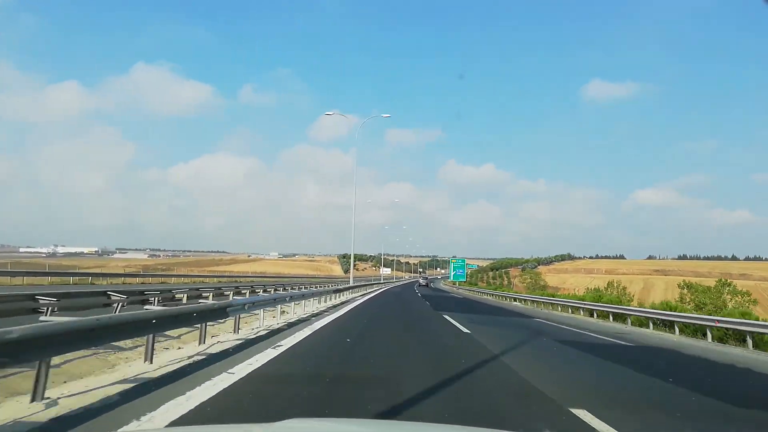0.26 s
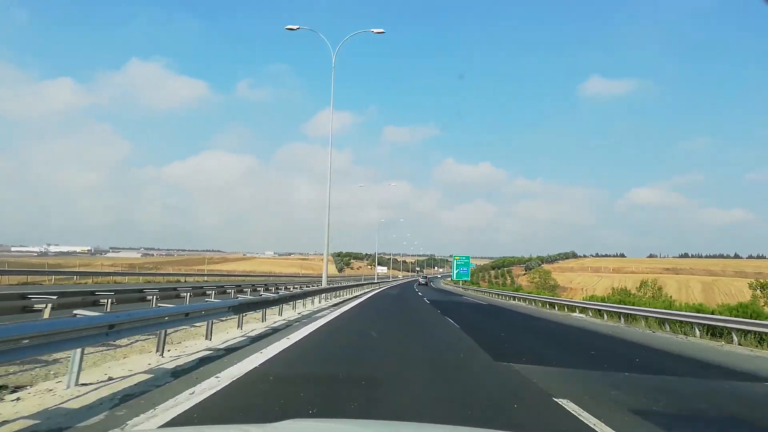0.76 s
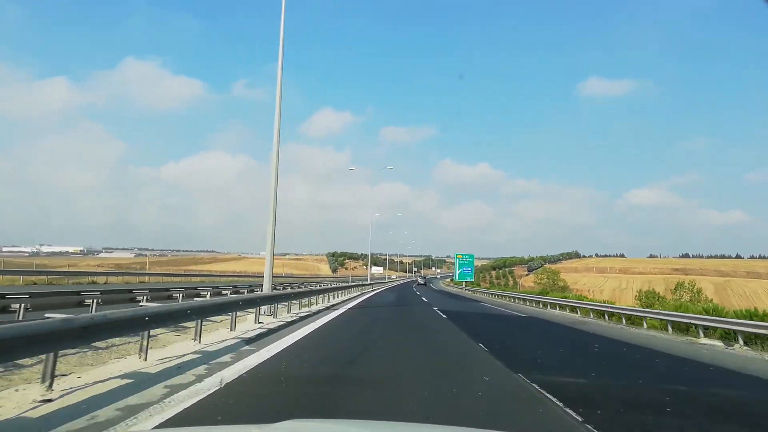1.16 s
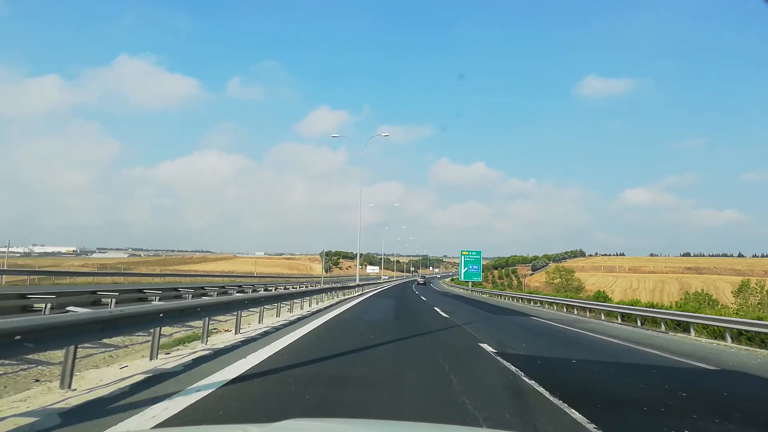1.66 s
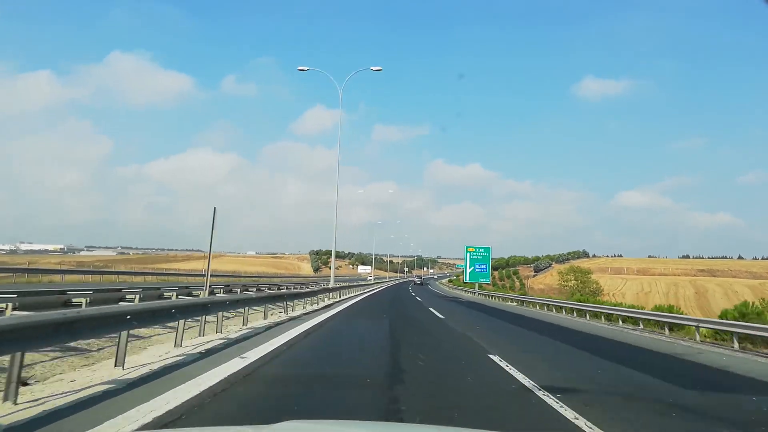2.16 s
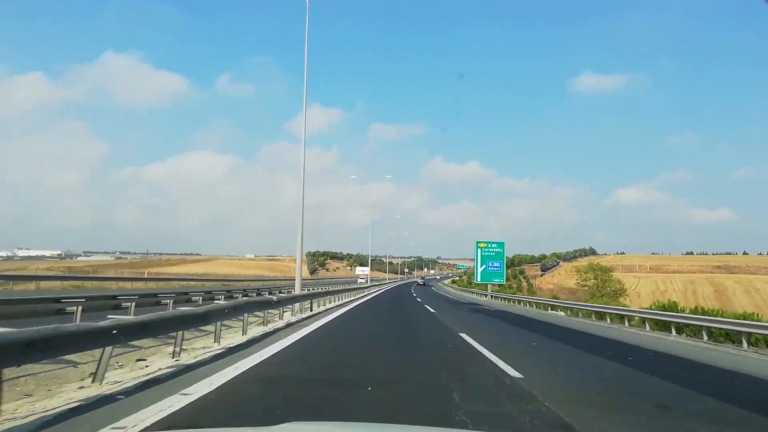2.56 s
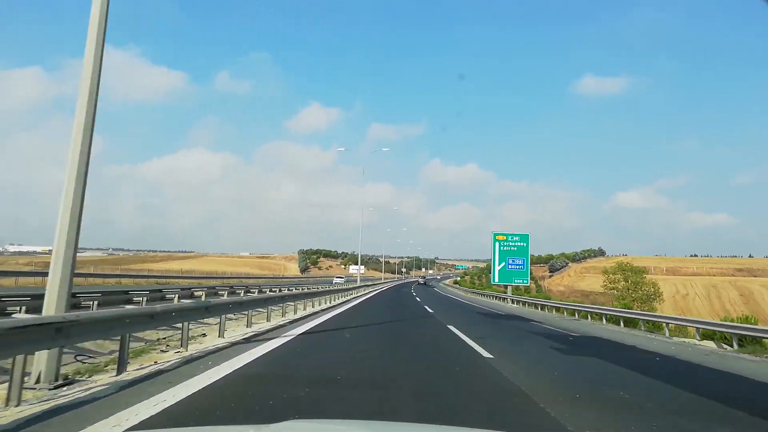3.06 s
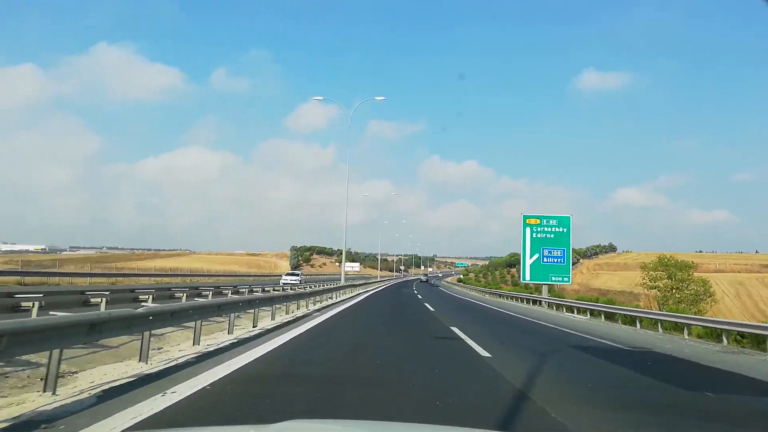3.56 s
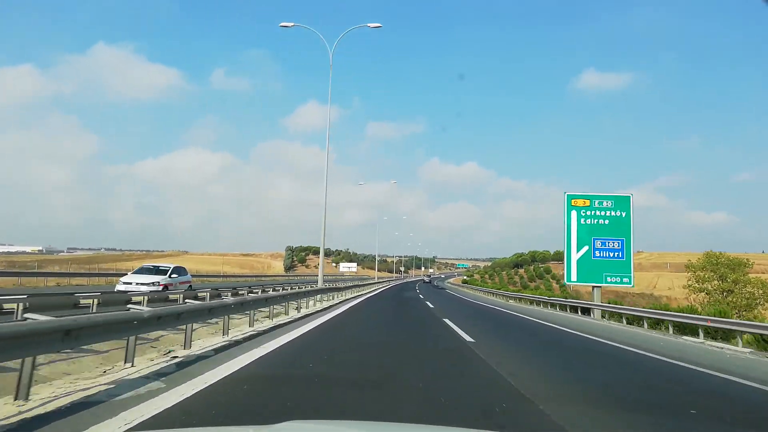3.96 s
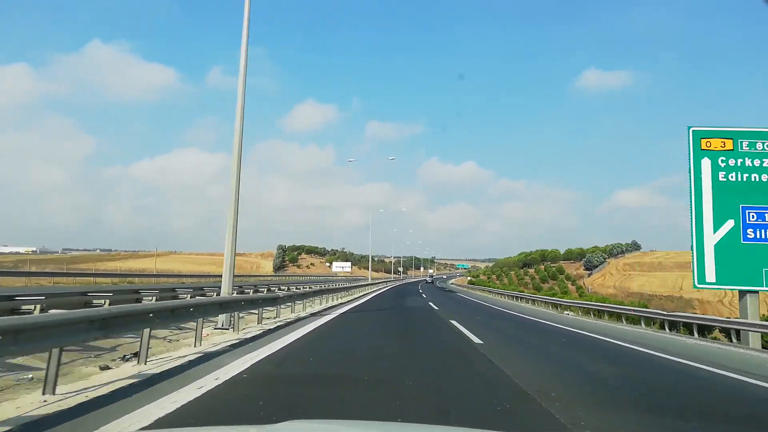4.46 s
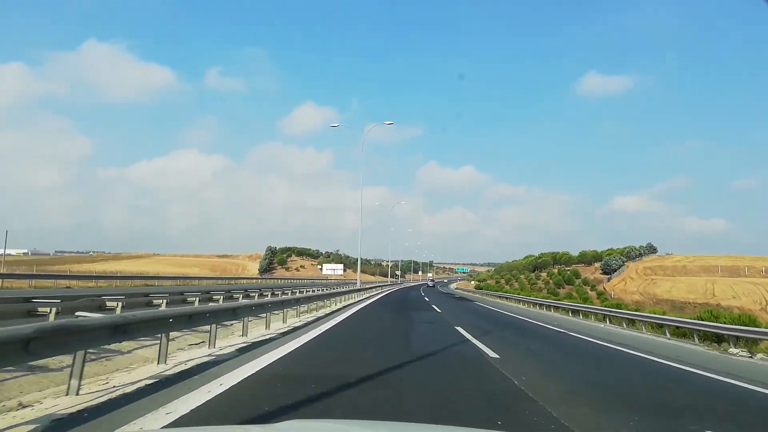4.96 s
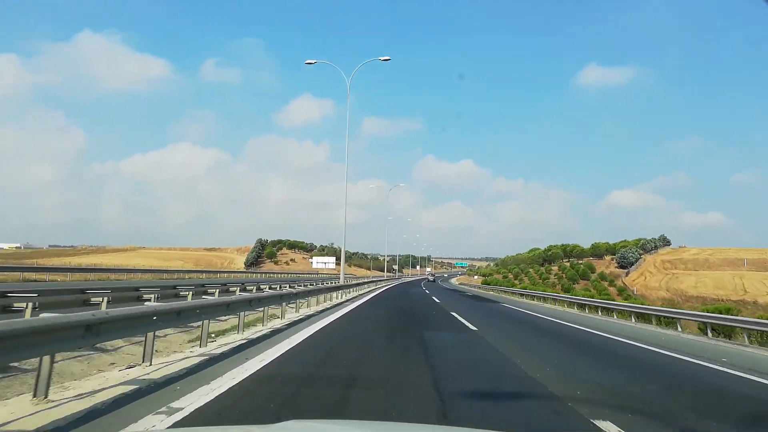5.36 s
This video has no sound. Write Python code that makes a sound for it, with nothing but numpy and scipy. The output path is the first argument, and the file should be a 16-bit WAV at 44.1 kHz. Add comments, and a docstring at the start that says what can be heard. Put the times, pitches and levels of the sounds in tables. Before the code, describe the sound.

Inside a moving car on a motorway, a steady, muffled roar of tyres and wind never stops. Deep booms thud up at about half a second, then a stronger cluster rolls from two to three seconds, with loose trim ticking and rustling. It calms afterwards, with a few weaker bumps near the end. Stereo microphones in the cabin duck slightly under the booms.

```python
"""A steady roar of tyres and wind in a car at motorway speed, then deep booms over rough patches.
Road unevenness shakes noise-driven modes of body, cabin air, suspension and tyre cavity.
Roar is shaped noise coloured by the cabin; something loose rustles (clumped noise) and ticks
(snaps plus ringing trim). A microphone pair hears it; gain control ducks everything under booms."""
import sys
import numpy as np
from scipy import signal
from scipy.fft import rfft, irfft
from scipy.io import wavfile
from scipy.ndimage import uniform_filter1d

SR = 44100
rng = np.random.default_rng(int(sys.argv[2]) if len(sys.argv) > 2 else 0)


def bounce(signal):
    """Save signal as a 16-bit WAV file at the path given by the first command-line argument."""
    frames = np.transpose(np.atleast_2d(signal))
    limited = np.clip(frames, -1, 1)
    pcm = np.round(limited * 32767).astype(np.int16)
    wavfile.write(sys.argv[1], SR, pcm)


N = 246945
FRAME, HOP = 4096, 1024  # samples
HZ = np.fft.rfftfreq(FRAME, 1 / SR)

# Mode tables: level relative within the group, width before the skirt exponent
# body on its mounts: (frequency [Hz], width [Hz], level [dB])
HEAVE_MODES = [(24.8, 8.4, -5), (38.4, 10, -13.5)]
# cabin air and floor pan: (frequency [Hz], width [Hz], level [dB])
BOOM_MODES = [(49.87, 7.7, 1.5), (60, 6.4, -8.5), (69.7, 13.3, -5.5), (87.4, 8.3, -9)]
# suspension: (frequency [Hz], width [Hz], level [dB])
THUD_MODES = [(97.7, 5.9, -5.5), (123.6, 6.3, 4), (131.3, 12.4, -2.5), (145.6, 9, -2.5)]
# air ring in the tyres: (frequency [Hz], width [Hz], level [dB])
CAVITY_MODES = [(172, 16, -2.5), (199.9, 16.3, -2), (221.1, 6.6, -1.5), (244.2, 10.6, -4.5)]
# panels: (frequency [Hz], width [Hz], left level [dB], right level [dB])
DRONE_MODES = [(270.3, 52, -1, -2.5), (297, 11.3, 1, 1), (333.3, 19.5, -7.5, 1.5), (354, 12, -10.5, 1),
               (368, 126, -9.5, -11), (467, 33, -13.5, -19)]

# uneven road: (start [s], length [s], heave [dB], boom [dB], thud [dB], tyre cavity hum [dB])
ROAD_PATCHES = [(0.38, 0.074, -30, -16, -16, -31), (0.473, 0.076, -30, -23, -16.5, -38),
                (0.663, 0.15, -28, -25, -28.5, -34), (0.821, 0.066, -25, -28, -23, -45),
                (1.156, 0.089, -43, -25, -41, -40), (1.332, 0.071, -30, -33, -33, -44),
                (1.799, 0.13, -27, -29, -23.5, -33), (1.901, 0.094, -23, -15.5, -19.5, -29.5),
                (2.014, 0.1, -20, -25, -30, -31.5), (2.115, .1, -17, -15, -23.5, -36),
                (2.229, 0.068, -17, -15.5, -21.5, -46), (2.429, 0.18, -18.5, -25.5, -35, -51),
                (2.605, 0.09, -23.5, -25, -33, -43), (2.738, 0.077, -22, -23, -26.5, -24.5),
                (2.804, 0.12, -17.5, -20.5, -17.5, -27.5), (3.465, .1, -48, -29, -50, -38),
                (4.12, 0.074, -37, -37, -31, -31), (4.392, .07, -36, -36, -37, -32),
                (4.663, 0.12, -25, -28.5, -30, -31.5), (4.824, 0.055, -34, -33, -28, -39),
                (5.2, 0.096, -30, -30, -44, -35.5), (5.414, 0.22, -18.5, -24, -36, -38)]
# Per group, in the order heave, boom, thud, hum, drone
# level on plain asphalt: (level [dB])
ASPHALT_DB = [-32, -29.5, -30, -33, -36]
# shift of the answer from the patch start; hum and drone lead: (lag [s])
GROUP_LAG_S = [0.046, 0.068, 0.011, -0.014, -0.0095]
# decay after the patch: (t60 [s])
SETTLE_T60_S = [0.48, 0.77, .15, 0.35, 0.11]
BUILD_S = 0.035  # time to full swing
DRONE_SHARE_DB = -8.5  # panels' share of the hum's shake

# tread and wind spectrum: (frequency [Hz], relative density [dB per Hz])
ROAR_SPECTRUM = [(260, -46), (450, 0), (522, -3), (596, -3.5), (756, -3.5), (986, -7.5), (1350, -9.5),
                 (1680, -14), (2580, -26.5), (4030, -27), (7070, -41), (9230, -42), (15500, -70)]
# standing waves at the two microphones: (frequency [Hz], width [Hz], left gain [dB], right gain [dB])
CABIN_WAVES = [(578, 32, 3.5, 2), (721, 12, -8.5, -0.5), (757, 25, 4.5, 7), (900, 31, -7.5, 8),
               (909, 31, 11, -7), (1054, 53, -1, 4.5), (1300, 40, -2.5, -11.5), (1332, 34, 3, 8),
               (1435, 58, -9, -0.5), (1667, 28, -11, 6), (1777, 74, 4, -11.5), (1880, 14, 3, 10.5),
               (2068, 80, 1.5, 5.5), (2237, 91, 7, 4), (2460, 60, 4, 4.5)]
# roar of the tread: (time [s], level [dB])
ROAR_LEVEL = [(0, -45.5), (1.5, -45.7), (3.0, -45.5), (4.0, -44.5), (4.8, -45), (5.6, -45)]

# slides of the loose thing:
# (start [s], length [s], level at end [dB], growth over length [dB], added on left [dB])
SLIDE_EVENTS = [(.03, 0.12, -63, 11, 6), (0.408, .065, -66.5, 2.5, 1), (.5, .18, -66, 4, -4),
                (1.93, .23, -64, 7, -1), (2.155, 0.088, -58, 0, -1), (2.257, 0.12, -60.5, -1.5, -1),
                (2.372, 0.11, -56, .3, -.5), (2.53, 0.12, -67.5, 6, -.3), (2.683, .05, -68, -1.5, -.3),
                (2.782, .05, -66.5, 1.5, 0), (2.89, .05, -66, .3, 0), (2.98, .06, -69, -2.5, 0),
                (3.11, 0.14, -73, -11, 4), (3.21, 0.12, -67, -1.5, -3), (3.332, 0.12, -69, -10, .3),
                (3.662, .22, -73, 5, .5), (3.918, 0.096, -67, -4, 3), (4.02, 0.1, -63, 1.5, 2),
                (4.17, 0.36, -80, 3, .5), (5.416, 0.15, -69, 0, .2)]
# scrape spectrum: (frequency [Hz], relative density [dB per Hz])
RUSTLE_SPECTRUM = [(2000, -40), (3500, -4.5), (6000, -9.5), (8000, -3.5), (10000, -4), (11500, -5.5),
                   (13000, -8), (15500, -10)]
# faint rustle's spectrum against the slides': (frequency [Hz], gain [dB])
SHIVER_TILT = [(2000, 1), (10000, 1), (13000, -4), (15500, -9)]
SHIVER_DB = -74  # faint constant rustle
GRIP_S, STOP_T60_S = 0.025, 0.16  # a slide takes hold, then stops

# (time [s], level [dB], left minus right [dB], trim knock re snap [dB], snap t60 [s], snap centre [Hz])
TICK_EVENTS = [(0.1354, -49, -1, -14, .04, 7500), (0.147, -53, 0, -14, .04, 7500),
               (0.158, -52, 0, -14, .04, 8000), (0.4189, -61, -6, -12, .04, 9500),
               (0.44, -56, -3, -18, .15, 4870), (0.4613, -57, -5, 1, .05, 7500),
               (2.1732, -46.5, 0, -6, .04, 8500), (2.2234, -53, -5, -12, .05, 9500),
               (2.2914, -51, -16, -20, .02, 13500), (2.328, -48, 0, -18, 0.044, 4600),
               (2.4016, -48, -15, -18, 0.043, 9100), (2.6367, -44, -13.5, 2.5, 0.019, 8700),
               (2.6908, -58, -3, -12, .06, 8500), (2.7332, -55, -10, -7, .04, 8000),
               (2.799, -61, -1, -12, .03, 9000), (2.819, -53, -7, -5, .04, 8500),
               (2.899, -47, -7, -2.5, 0.037, 9000), (2.9886, -57, -6, -12, .04, 8500),
               (3.9474, -61, -3, -16, .05, 10000), (4.0294, -61, -4, -16, .04, 9000),
               (4.5094, -61, -3, -12, .04, 9500), (5.0325, -61, -5, -12, .06, 9000),
               (5.473, -50, -7, -7, 0.036, 8500), (5.4984, -51, -9, -6, 0.029, 9500)]
# ringing plastic trim: (frequency [Hz], relative level [dB], t60 [s])
TRIM_MODES = [(1630, 4.5, .03), (1760, -1.5, 0.036), (2250, 0, 0.011), (2940, 1, 0.023), (3628, -5, .012),
              (4240, -5, 0.012), (4700, -9, 0.011), (5600, -12, .008)]

# treble colour of the two microphone ports: (frequency [Hz], left gain [dB], right gain [dB])
PORT_GAINS = [(1500, 0, 4), (5000, -2.5, 0.5), (7000, 1.5, 0), (9500, -1.5, 1.5), (10900, -5.5, 2),
              (13000, -3, -4), (15500, -10, -3)]
# microphone pair: (frequency [Hz], likeness [0-1], right leads by [rad], left minus right [dB])
MIC_PAIR = [(20, 1, 0, 0), (50, 1, .06, 0), (75, .993, .1, 0), (100, .95, .2, 0), (200, .94, .3, 0),
            (240, .8, .3, -.5), (310, .2, .3, -1), (430, .3, 1.6, -1), (520, .78, 3.1, -1),
            (900, .65, 3.5, -2), (1500, .5, 6.2, -5), (2100, .35, 9.4, -4.5), (3300, .2, 12.6, -4.5),
            (5700, .1, 21, -4), (7300, .1, 27, -4), (10000, .1, 37, -11), (12000, .1, 44, -10),
            (15500, .1, 57, -3)]
HISS_DB, EDGE_HZ = -75.5, 15740  # microphone noise; upper band limit
DUCK_ABOVE_DB, DUCK_DB_PER_DB = -21.5, 0.21
RECOVERY_DB_PER_S = 11.0  # fall of the held level, not of the gain


def body():
    """Four groups of low modes, each driven by noise and shaken by the road's unevenness."""
    out = np.zeros((2, N))
    for group, modes in enumerate((HEAVE_MODES, BOOM_MODES, THUD_MODES, CAVITY_MODES)):
        db = modes_db(modes, skirt=1.46)
        ringing = pair_noise(db, db, patchy_db=1.6)
        # the road, more than chance, sets the level: even out part of the noise's own swell
        swell = smooth(ringing.mean(0) ** 2, 3000, 2000)
        steadied = evened(ringing / (abs(swell) + 0.089) ** 0.28)
        out += shake(group, group + 2) * steadied
    return out


def tyres():
    """Panel modes drone with the tyre hum; wide tread and wind noise takes the cabin's colour."""
    drone_left_db = modes_db(DRONE_MODES, skirt=1.44)
    drone_right_db = modes_db(DRONE_MODES, skirt=1.263, axis=3)
    drone = pair_noise(drone_left_db, drone_right_db, patchy_db=0.72)
    left_db, right_db = (
        read(ROAR_SPECTRUM, HZ) + sum(wave[k] * peak(wave[0], wave[1]) for wave in CABIN_WAVES)
        for k in (2, 3))
    roar = pair_noise(left_db, right_db, patchy_db=0.8)
    return shake(4, 5, DRONE_SHARE_DB) * drone + curve(ROAR_LEVEL, axis=1) * roar


def rustle():
    """Dense tiny scrapes as noise in clumps a few ms long: slides over a constant faint shiver."""
    clumps = evened(smooth(rng.standard_normal(N), 220, 120))
    grain = evened(gain_of(0.9 * clumps))
    left_db, right_db = (read(RUSTLE_SPECTRUM, HZ) + read(PORT_GAINS, HZ, axis=k) for k in (1, 2))
    slide_power = np.zeros((2, N))
    for start, length, db, grow_db, left_add_db in SLIDE_EVENTS:
        power = gain_of([[db + left_add_db], [db]]) ** 2
        slide_power += power * gesture(start, length, GRIP_S, STOP_T60_S, grow_db)
    slides = np.sqrt(slide_power) * pair_noise(left_db, right_db, patchy_db=1.3)
    tilt_db = read(SHIVER_TILT, HZ)
    shiver = gain_of(SHIVER_DB) * pair_noise(left_db + tilt_db, right_db + tilt_db, patchy_db=1.5)
    return (slides + shiver) * grain


def ticks():
    """Each tick is a bright snap of noise plus a ragged knock that rings the plastic trim."""
    out = np.zeros((2, N + FRAME))
    t = np.arange(FRAME) / SR
    trim = sum(gain_of(db - 60 * t / t60) * np.sin(2 * np.pi * hz * t) for hz, db, t60 in TRIM_MODES)
    ports = gain_of([read(PORT_GAINS, HZ, axis=1), read(PORT_GAINS, HZ, axis=2)])
    for start, db, pan_db, knock_db, t60, hz in TICK_EVENTS:
        burst, chatter = rng.standard_normal((2, 2, FRAME))
        # low snaps are narrow and ping, high ones spread wide
        log_width = (hz / 25000) ** 1.12
        band = ports * np.exp(-(np.log(HZ / hz + 1e-9) / log_width) ** 2 / 2)
        snap = irfft(rfft(burst) * band) / np.sqrt(np.mean(band ** 2))
        snap *= gain_of(-60 * t / t60) * np.minimum(t / 0.00071, 1)
        # one blow, then the contact chatters briefly
        blows = (t == 0) + 0.071 * chatter * np.exp(-t / 0.00037)
        blows /= np.linalg.norm(blows[1])
        knock = signal.fftconvolve(blows, trim[None], axes=1)[:, :FRAME]
        sides = gain_of(db + np.array([[pan_db / 2], [-pan_db / 2]]))
        at = round(start * SR)
        out[:, at:at + FRAME] += sides * (snap + gain_of(knock_db) * knock)
    return out[:, :N]


def shake(group, column, share_db=0):
    """Amplitude of a mode group: plain asphalt plus its time-shifted answer to every patch."""
    power = gain_of(ASPHALT_DB[group]) ** 2
    for patch in ROAD_PATCHES:
        start = patch[0] + GROUP_LAG_S[group]
        answer = gesture(start, patch[1], BUILD_S, SETTLE_T60_S[group])
        power = power + gain_of(patch[column] + share_db) ** 2 * answer
    return np.sqrt(power)


def gesture(start, length, rise, t60, grow_db=0):
    """Power that rises smoothly, changes by grow_db over its length, and dies away."""
    t = np.arange(N) / SR - start
    up = np.sin(np.pi / 2 * np.clip(t / rise, 0, 1)) ** 2
    growth_db = grow_db * (np.clip(t / length, 0, 1) - 1)
    decay_db = -60 * np.clip(t - length, 0, 2 * t60) / t60
    return (up * gain_of(growth_db + decay_db)) ** 2


def pair_noise(left_db, right_db, patchy_db):
    """Noise at two microphones, partly alike, patchy in time and frequency; mid signal rms 1."""
    frames = N // HOP + 5
    a, b, c, d, patches = rng.standard_normal((frames, len(HZ), 5)).T
    patches = uniform_filter1d(patches, size=40, axis=0)
    patches = evened(uniform_filter1d(patches, size=4, axis=1))
    shared, own = a + 1j * b, c + 1j * d
    same = np.clip(read(MIC_PAIR, HZ), 0, 1)[:, None]
    lead_rad = np.interp(HZ, *np.transpose(MIC_PAIR)[[0, 2]])
    right = np.exp(1j * lead_rad)[:, None] * (same * shared + np.sqrt(1 - same ** 2) * own)
    tilt_db = read(MIC_PAIR, HZ, axis=3) / 2
    spectra = np.array([shared * gain_of(left_db + tilt_db)[:, None],
                        right * gain_of(right_db - tilt_db)[:, None]])
    spectra *= gain_of(patchy_db * patches)
    pair = signal.istft(spectra, nperseg=FRAME, noverlap=FRAME - HOP)[1][:, :N]
    return pair / np.sqrt(np.mean(pair.mean(0) ** 2))


def modes_db(modes, skirt, axis=2):
    """Spectrum of modes driven by noise; a higher skirt cuts them off more steeply."""
    power = sum(gain_of(mode[axis]) ** 2 * peak(mode[0], mode[1]) ** skirt for mode in modes)
    return 10 * np.log10(power)


def peak(hz, width_hz):
    """Power response of one resonance."""
    return 1 / (1 + (2 * (HZ - hz) / width_hz) ** 2)


def read(points, hz, axis=1):
    """A table column joined by straight lines on a log-frequency axis."""
    columns = np.transpose(points)
    return np.interp(np.log(hz + 1), np.log(columns[0] + 1), columns[axis])


def curve(rows, axis):
    """A dB column over time as a gain for every sample."""
    columns = np.transpose(rows)
    return gain_of(np.interp(np.arange(N) / SR, columns[0], columns[axis]))


def smooth(x, first, second):
    """Two running means, lengths in samples."""
    return uniform_filter1d(uniform_filter1d(x, size=first), size=second)


def evened(x):
    """Scales to rms 1."""
    return x / np.sqrt(np.mean(x ** 2) + 1e-20)


def gain_of(db):
    """Decibels to amplitude."""
    return 10 ** (np.asarray(db) / 20)


def scene():
    """Everything in the cabin."""
    return body() + tyres() + rustle() + ticks()


def record(dry):
    """Adds microphone hiss; gain control ducks loud booms and recovers; then the band limit."""
    heard = dry + gain_of(HISS_DB) * rng.standard_normal((N, 2)).T
    power = uniform_filter1d((heard ** 2).mean(0), size=2600)
    power_db = 10 * np.log10(abs(power) + 1e-12)
    # hold each peak, falling at a constant rate
    fall_db = np.arange(N) * RECOVERY_DB_PER_S / SR
    held_db = np.maximum.accumulate(power_db + fall_db) - fall_db
    over_db = np.maximum(held_db - DUCK_ABOVE_DB, 0)
    ducked = heard / gain_of(DUCK_DB_PER_DB * uniform_filter1d(over_db, size=1300))
    padded = np.pad(ducked, ((0, 0), (HOP, HOP)), "reflect", reflect_type="odd")
    lowpass = signal.firwin(2 * HOP + 1, EDGE_HZ, window=("kaiser", 9), fs=SR)
    return signal.oaconvolve(padded, lowpass[None], "valid", axes=1)


dry = scene()
out = record(dry)
bounce(out)
```